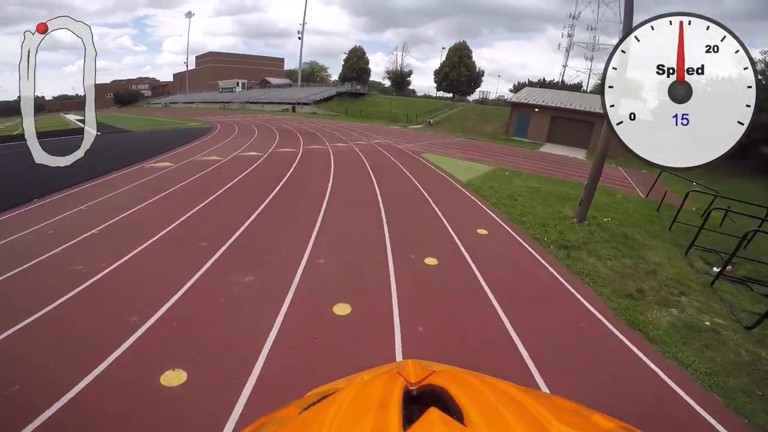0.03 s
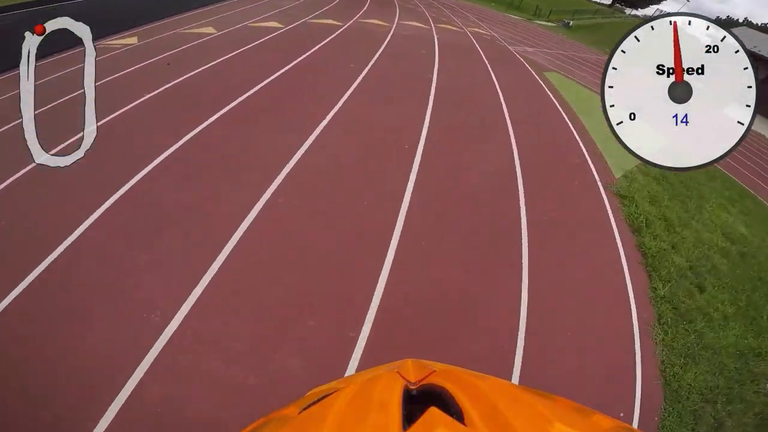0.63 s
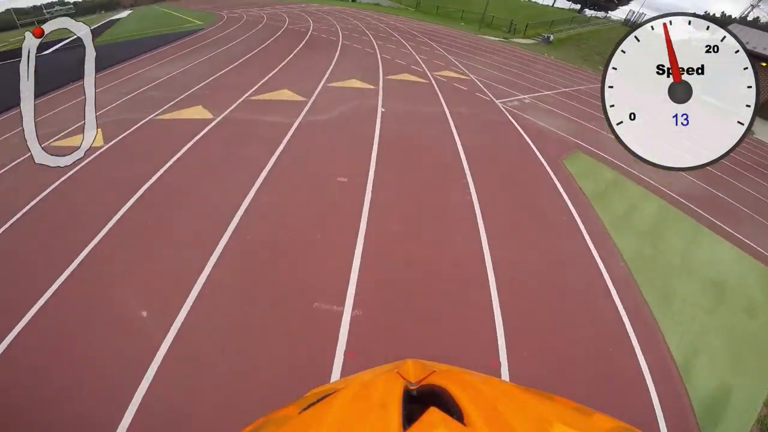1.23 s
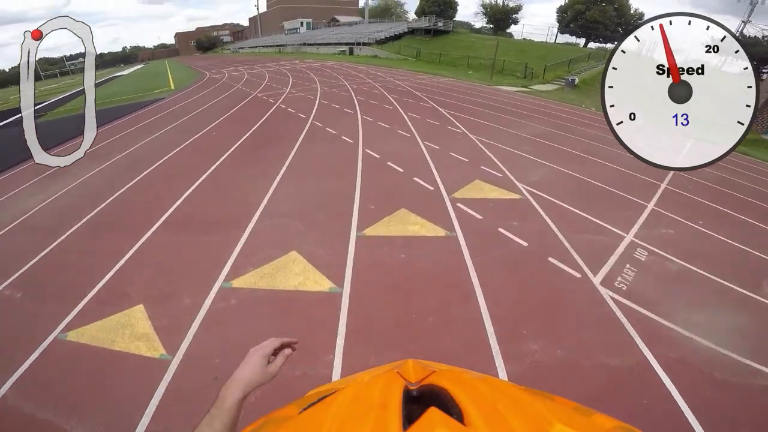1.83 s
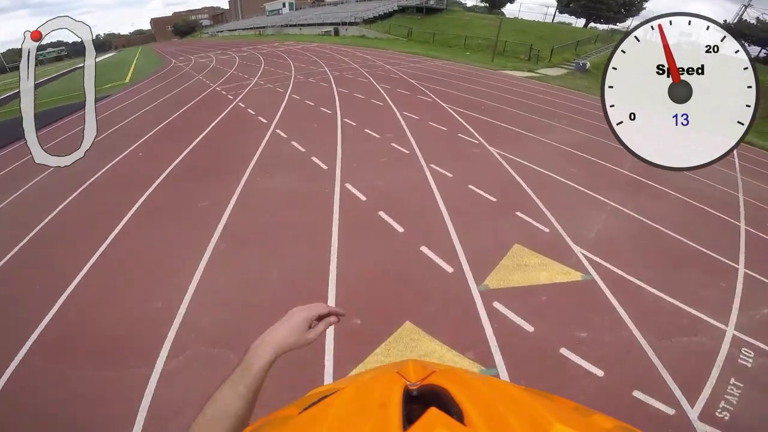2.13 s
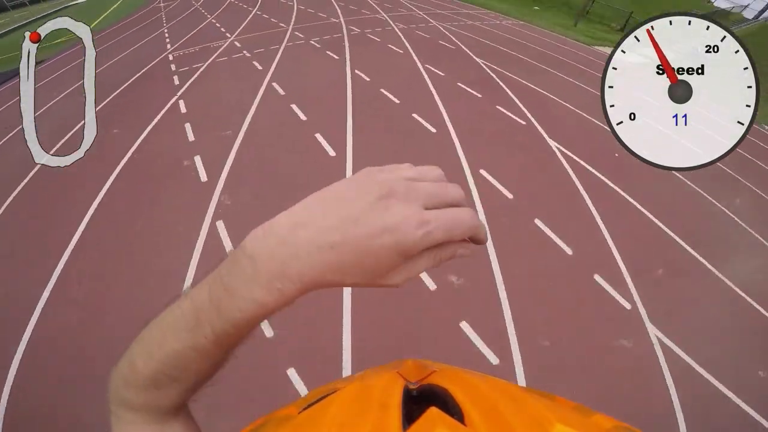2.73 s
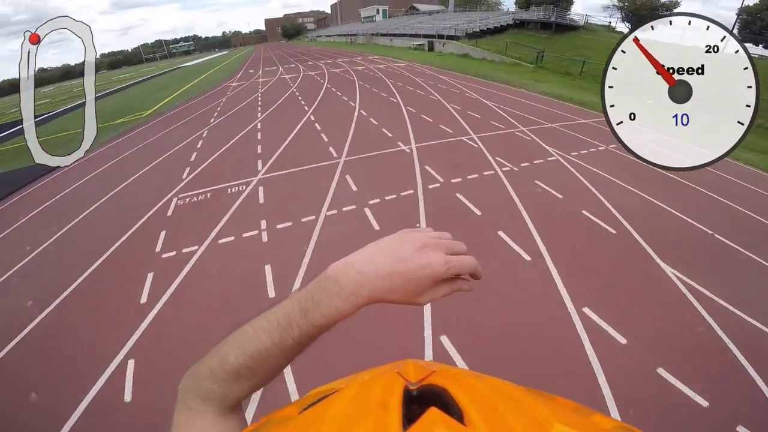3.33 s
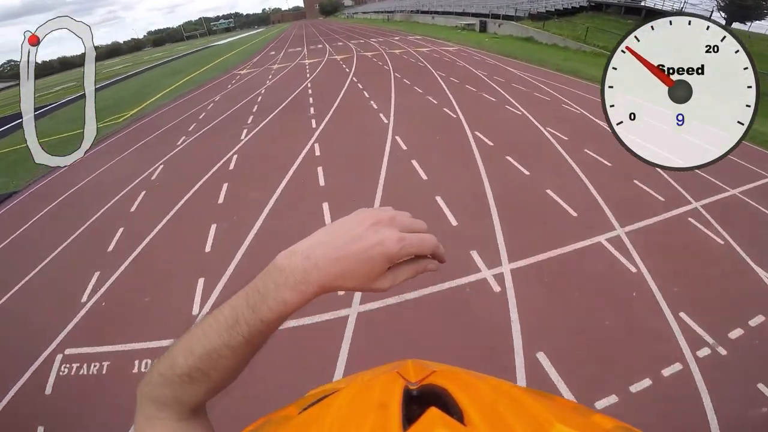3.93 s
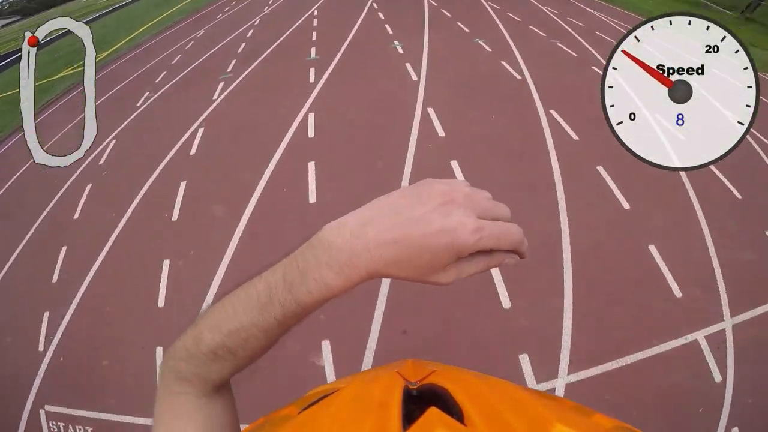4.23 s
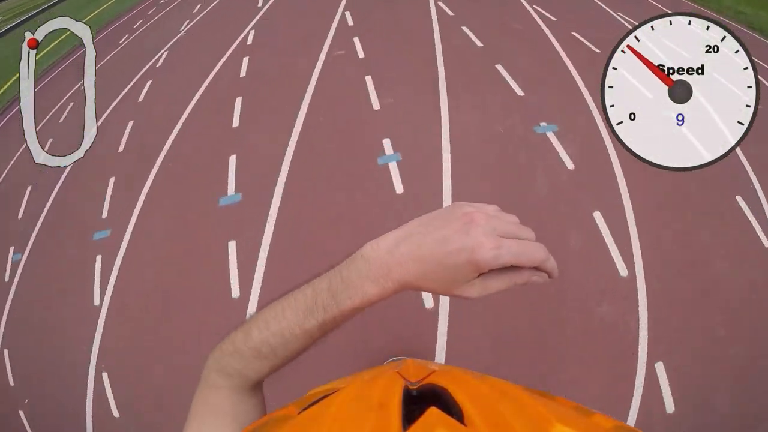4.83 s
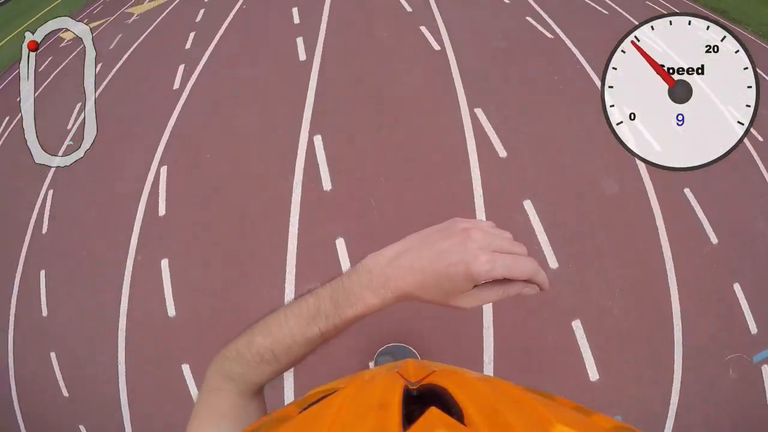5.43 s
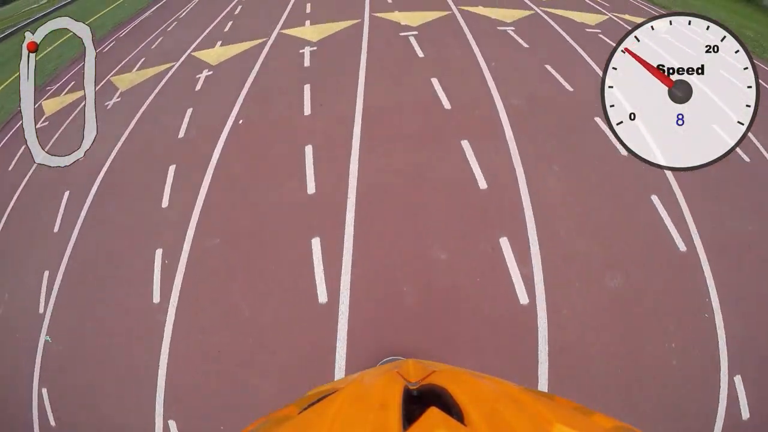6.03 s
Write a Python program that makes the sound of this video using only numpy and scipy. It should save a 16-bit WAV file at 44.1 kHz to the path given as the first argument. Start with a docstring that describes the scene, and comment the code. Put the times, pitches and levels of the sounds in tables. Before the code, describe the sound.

An electric skateboard rolls on a rubber running track, heard from the rider's helmet. From the start, deep wind thumps the microphone over the hollow roar of the wheels, a faint fluttering hiss and a steady low boom. Stronger gusts hit at about 0.6 and 1.2 seconds. A soft, brief scuff comes at around 2.2 seconds, followed by a few small, sharp clicks from 2.4 seconds, the loudest at 2.7. The rolling gradually gets quieter and a little lower as the board slows. The wind swells again between 3 and 4 seconds, then drops away. At about 4.4 seconds the motor gives a short pull, and from 4.8 it holds a faint, fuzzy, slightly raspy whine that rises a little. One more gust thumps near 5.4 seconds, and the rolling and whine continue to the end, just after 6 seconds.

```python
"""An electric skateboard coasts round a rubber running track, heard from a camera on the rider's helmet.
The track's grain shakes wheels and deck into a hollow roar, and rubber peeling off the track hisses.
Wind thumps the microphone and eases as the board slows. A brief scuff and a few sharp clicks come
midway; then the motor pulls again with a faint, fuzzy whine."""
import sys
import numpy as np
from scipy import signal
from scipy.fft import rfft, irfft
from scipy.io import wavfile
from scipy.ndimage import uniform_filter1d, minimum_filter1d

SR = 44100
rng = np.random.default_rng(int(sys.argv[2]) if len(sys.argv) > 2 else 0)


def digitize_waveform(pressure):
    """Quantize a signal to 16-bit integers and store it at the path in sys.argv[1].

    Rows of a 2-D input are taken as channels; values are limited to [-1, 1].
    """
    field = np.atleast_2d(pressure).T
    bounded = np.clip(field, -1, 1)
    quanta = np.round(bounded * 32767).astype(np.int16)
    wavfile.write(sys.argv[1], SR, quanta)


N = 272979
TIME = np.arange(N) / SR
WHINE_START_HZ = 1977


def gain_of(db):
    """Turns decibels into a number to multiply a sound by."""
    return 10 ** (np.asarray(db) / 20)


def evened(x):
    """Scales a signal so that its average power is one."""
    return x / np.sqrt(np.mean(x ** 2) + 1e-20)


def follow(rows, t=TIME):
    """Joins timed rows with straight lines, giving one curve for each column after the time."""
    times, *columns = np.transpose(rows)
    return [np.interp(t, times, column) for column in columns]


def level_at(colour, hz):
    """Looks up the dB at hz in a colour, a table of how strong each frequency is."""
    frequencies, levels_db = np.transpose(colour)
    return np.interp(np.log(hz + 1), np.log(frequencies + 1), levels_db)


def add(mix, start_s, sound):
    """Mixes a sound in at start_s seconds."""
    part = mix[round(start_s * SR):][:len(sound)]
    part += sound[:len(part)]


def noise(colour, size=N):
    """Steady noise with the given colour."""
    gains = gain_of(level_at(colour, np.fft.rfftfreq(size, 1 / SR)))
    return evened(irfft(rfft(rng.standard_normal(size)) * gains, size))


def wander(rate_hz):
    """A smooth random curve that wobbles up to about rate_hz times a second."""
    hz = np.fft.rfftfreq(N, 1 / SR)
    return evened(irfft(rfft(rng.standard_normal(N)) / (1 + (hz / rate_hz) ** 4), N))


def moving_noise(colour_at, size=1024):
    """Noise of even power whose changing colour is colour_at(times, frequencies), in dB."""
    frames = dict(nperseg=size, noverlap=size - size // 4)
    hz, t, spectra = signal.stft(rng.standard_normal(N), SR, **frames)
    gains = gain_of(colour_at(t, hz[:, None]))
    gains = gains / np.linalg.norm(gains, axis=0)
    return evened(signal.istft(spectra * gains, **frames)[1][:N])


def steadied(x, span_s):
    """Takes the slow, random swells out of a noise."""
    return x / np.sqrt(uniform_filter1d(x ** 2, int(span_s * SR)) + 1e-6)


def fuzzy_tone(hz, width_hz):
    """A narrow band of noise around a pitch, which may be steady or moving."""
    phase = 2 * np.pi * np.cumsum(np.full(N, hz)) / SR
    return evened(wander(width_hz / 2) * np.cos(phase) + wander(width_hz / 2) * np.sin(phase))


def swell(middle_s, length_s, t):
    """A bell-shaped rise and fall, one at its top."""
    return np.exp(-(2 * (t - middle_s) / length_s) ** 2)


def chop(t=TIME):
    """How choppy the air is: spells full of small swirls come and go."""
    # Each row: middle in seconds, length in seconds, lift of the small swirls in dB.
    squalls = [(0.19, 1, 5.5), (1.8, 0.54, 3), (3.246, 0.74, 3.5)]
    return sum(lift_db * swell(middle_s, length_s, t) for middle_s, length_s, lift_db in squalls)


def pace(t=TIME, cruise_m_per_s=5):
    """The board slows, then picks up a little: 0 means cruising speed, -1 half of it."""
    # Each row: time in seconds, speed in metres per second.
    speeds = [(0, 7.06), (1.9, 5.94), (3.1, 4.96), (3.7, 4.66), (4.7, 3.41), (6.19, 4.1)]
    return np.log2(follow(speeds, t)[0] / cruise_m_per_s)


def load(rise_s=0.1, release_s=0.12, sag_per_s=0.1):
    """How hard the motor works: each pull builds quickly, sags as the board gains speed, and lets go."""
    # Overlapping pulls add up. Each row: start in seconds, length in seconds, strength from 0 to 1.
    pulls = [(4.42, .17, 0.5), (4.78, 1.6, .75), (4.826, 0.13, 0.3), (5.213, 0.1, 0.3)]
    total = 0
    for start_s, length_s, strength in pulls:
        age = np.maximum(TIME - start_s, 0)
        fall = np.exp(-sag_per_s * age - np.maximum(age - length_s, 0) / release_s)
        total += strength * np.minimum(age / rise_s, 1) * fall
    return total


def whine_pitch(t=TIME, climb_start_s=4.9, climb_hz_per_s=190, top_hz=2080):
    """The motor's pitch in Hz, which climbs steadily and then levels off."""
    return np.minimum(WHINE_START_HZ + climb_hz_per_s * np.maximum(t - climb_start_s, 0), top_hz)


def camera_whistle(level_db=-3):
    """The camera's electronics give off faint, steady, high tones."""
    # Each row: pitch in Hz, relative level in dB.
    tones = [(6293, -78), (6325, -76), (8716, -83), (12618, -73.5)]
    return sum(gain_of(level_db + db) * np.sqrt(2) * np.sin(2 * np.pi * hz * TIME) for hz, db in tones)


def clock_ripple(sound):
    """The camera's sample clock wobbles, which adds faint copies of the sound in the treble."""
    # Each row: wobble rate in Hz, timing swing in dB (0 dB is one sample).
    ripples = [(7812, -17), (11719, -20), (15625, -23)]
    swing = sum(gain_of(db) * np.sin(2 * np.pi * hz * TIME) for hz, db in ripples)
    return swing * np.gradient(sound, axis=1)


def limited(x, ceiling_db=-6, hold_s=0.02):
    """A limiter turns the sound down briefly around the strongest thumps."""
    size = int(hold_s * SR)
    allowed_gain = np.minimum(gain_of(ceiling_db) / (abs(x) + 1e-9), 1)
    return x * uniform_filter1d(minimum_filter1d(allowed_gain, size), size)


def boom(level_db=-28):
    """A deep, steady boom runs under everything and shows when the wind drops."""
    return gain_of(level_db) * steadied(fuzzy_tone(hz=52, width_hz=16), span_s=0.36)


def hums(fade_s=0.14):
    """Low, rough hums well up in the roar, hold and fade out."""
    # Each row: middle in seconds, length in seconds, pitch in Hz, level in dB.
    spells = [(.2, 0.71, 209.8, -30.5), (1.85, 0.51, 358.5, -30), (3.146, .25, 438.5, -32)]
    out = np.zeros(N)
    for middle_s, length_s, hz, level_db in spells:
        fade = np.clip((length_s / 2 - abs(TIME - middle_s)) / fade_s + 0.5, 0, 1)
        out += gain_of(level_db) * fade * fuzzy_tone(hz, width_hz=80)
    return out


def drone(fringe_db=-7):
    """A drone with a wider, fainter fringe comes and goes, pitched above the roar."""
    # Each row: time in seconds, pitch in Hz, level in dB.
    course = [(0, 591.5, -39), (1.0, 640, -36), (1.9, 669, -46.5), (2.6, 698, -41), (3.4, 691.4, -50),
              (4.4, 665.3, -41), (5.35, 637.8, -36.5), (5.8, 553.4, -36.5), (6.19, 471, -40)]
    hz, level_db = follow(course)
    core = fuzzy_tone(hz, width_hz=144)
    return gain_of(level_db) * (core + gain_of(fringe_db) * fuzzy_tone(hz, width_hz=300))


def scuffs():
    """Brief rubs that swell and fade."""
    # Each row: middle in seconds, length in seconds, level in dB.
    rubs = [(0.505, .05, -45), (2.15, 0.12, -47.5), (2.341, 0.05, -38)]
    # Each row: frequency in Hz, relative level in dB.
    rub_colour = [(400, -5), (1000, 11), (2000, -2), (3500, -6), (5600, -4.5), (7000, -22), (15000, -30)]
    out = np.zeros(N)
    for middle_s, length_s, level_db in rubs:
        size = int(length_s * SR)
        arch = np.sin(np.linspace(0, np.pi, size))
        add(out, middle_s - length_s / 2, gain_of(level_db) * noise(rub_colour, size) * arch)
    return out


def clicks(rebound_s=0.00191, rebound_db=-5, snap_fade_s=0.0066):
    """Each small, hard click rings briefly with a bright snap, and bounces once."""
    # Each row: start in seconds, level in dB, relative level of the snap in dB.
    hits = [(0.321, -35.5, 5), (2.3858, -27, -4), (2.3982, -21, -3.5), (2.4540, -20, -11),
            (2.667, -27, -21), (2.678, -10, -30)]
    # Each row: pitch in Hz, relative level in dB, seconds to fade by 60 dB.
    ring_tones = [(828, 4.5, 0.024), (1275, 3.5, 0.041), (1750, 2, 0.017), (2327, 3, 0.022),
                  (2970, -6.5, 0.011), (4200, -15, 0.0075), (5600, -11, 0.0074)]
    # Each row: frequency in Hz, relative level in dB.
    snap_colour = [(500, -12), (2000, 8), (4500, 7), (7000, 0), (9000, -4), (15000, -16)]
    out, t = np.zeros(N), np.arange(2048) / SR
    ring = sum((-1) ** k * gain_of(db - 60 * t / fade_s) * np.sin(2 * np.pi * hz * t)
               for k, (hz, db, fade_s) in enumerate(ring_tones))
    ring /= abs(ring).max()
    for start_s, level_db, snap_db in hits:
        for delay_s, loss_db in [(0, 0), (rebound_s, rebound_db)]:
            snap = noise(snap_colour, len(t)) * gain_of(snap_db - 60 * t / snap_fade_s) / 2
            add(out, start_s + delay_s, gain_of(level_db + loss_db) * (ring + snap))
    return out


def wind(level_db=0.53, usual_db=-20, buffet_db=0.96, gust_s=0.042, deep_hz=30, small_above_hz=60):
    """Swirls of air thump the microphone: deep ones in gusts, smaller, higher ones in choppy air."""
    # Each row: time in seconds, strength of the airflow in dB.
    airflow = [(0, -19.5), (1.0, -21), (1.6, -17), (2.65, -19.5), (2.83, -24.5), (3.1, -16), (4.05, -19),
               (4.3, -26.5), (6.19, -29.5)]
    # Each row: middle of a gust in seconds, lift in dB.
    gusts = [(.03, -1.5), (.58, 6.5), (1.24, 4.5), (2.16, 0), (2.28, 1), (3.22, 1.5), (3.51, 3), (4.55, 4),
             (4.95, 4), (5.39, 10.5), (5.91, 3.5)]
    # Each row: frequency in Hz, relative level in dB.
    wind_colour = [(8, -22.5), (18, -3.5), (28, 4.5), (40, -1), (52, 2.5), (75, -5.5), (110, -9.5),
                   (160, -13.5), (220, -20.5), (320, -25), (600, -45.5), (1200, -63), (4000, -102)]

    def gust_db(t):
        return sum(lift_db * swell(middle_s, gust_s, t) for middle_s, lift_db in gusts)

    def colour_at(t, hz):
        excess_db = follow(airflow, t)[0] - usual_db
        small_swirls_db = -1.5 + 0.36 * excess_db + chop(t) - gust_db(t)
        upper_range = np.clip(np.log2((hz + 1) / small_above_hz), 0, 1)
        deep_swirls_db = excess_db / (1 + (hz / deep_hz) ** 4)
        return level_at(wind_colour, hz) + small_swirls_db * upper_range + deep_swirls_db
    swirls = steadied(moving_noise(colour_at, size=4096), span_s=0.0703)
    strength_db = follow(airflow)[0] + gust_db(TIME) + buffet_db * wander(rate_hz=13)
    return gain_of(level_db + strength_db) * swirls


def motor(level_db=-51, rasp_db=4, shimmer_db=-26, pulsing_db=2, throb_hz=5.5, settled_s=4.8):
    """The motor pulls with a fuzzy, pulsing whine, a lower tone, a rasp and a throbbing high shimmer."""
    # Each row: frequency in Hz, relative level in dB.
    rasp_colour = [(300, -24), (700, 4.5), (950, 8), (1400, -3.5), (2600, -4.5), (3400, -33), (4500, -7.5),
                   (5100, -27), (6300, -12.5), (7200, -26), (15000, -43)]
    hz = whine_pitch()
    whine = gain_of(pulsing_db * wander(rate_hz=9.9)) * fuzzy_tone(hz, width_hz=186)
    # The tone about an octave down fades once the board is under way.
    lower_db = -1 - 11 * np.clip(TIME - settled_s, 0, 1)
    lower = gain_of(lower_db) * fuzzy_tone(hz * 0.495, width_hz=86.4)
    throb = 1 + 0.5 * np.sin(2 * np.pi * throb_hz * TIME + wander(rate_hz=2))
    shimmer = gain_of(shimmer_db) * throb * fuzzy_tone(hz=9950, width_hz=500)
    rasp = gain_of(rasp_db) * noise(rasp_colour)
    return gain_of(level_db) * load() * (whine + lower + shimmer + rasp)


def hiss(level_db=-50.5, flutter_db=0.72, patchy_db=2, peak_db=2, treble_hz=5400):
    """Rubber peels off the track with a fluttering hiss, louder with speed and as the motor pulls."""
    # Each row: frequency in Hz, relative level in dB.
    hiss_colour = [(400, -14), (950, 4.5), (1180, 5.5), (1400, -1), (1800, 3.5), (2300, 1.5), (3000, 0.5),
                   (3700, -0.5), (4600, -1), (5500, -6), (6400, -12.5), (7000, -19), (10000, -20),
                   (15500, -55)]
    # Each row: time in seconds, centre of a broad peak in Hz, lift of the treble in dB.
    drift = [(0, 2300, 1), (1.2, 2210, 1.5), (1.9, 2080, -2), (2.6, 2500, 3), (3.3, 3200, -4.5),
             (4.4, 2620, 3.5), (4.9, 2600, -0.5), (5.5, 2650, 3), (6.19, 2620, -4)]

    def colour_at(t, hz):
        def hump(centre_hz, octaves):
            return np.exp(-(np.log2((hz + 1) / centre_hz) / octaves) ** 2)
        peak_hz, treble_db = follow(drift, t)
        lift_db = treble_db * hump(treble_hz, octaves=0.59) + peak_db * hump(peak_hz, octaves=0.32)
        # Random patches, smoothed over frequency and then over time.
        patches = uniform_filter1d(rng.standard_normal(lift_db.shape), size=5, axis=0)
        patches = uniform_filter1d(patches, size=60, axis=1)
        return level_at(hiss_colour, hz) + lift_db + patchy_db * evened(patches)
    peeling = moving_noise(colour_at)
    return peeling * gain_of(level_db + 2 * pace() + load() + flutter_db * wander(rate_hz=24))


def wheels(roar_db=-30, body_db=-39.5, bumps_db=1.23):
    """The track's grain shakes wheels and deck into a hollow roar over a deep body."""
    # Each row of both tables: frequency in Hz, relative level in dB.
    roar_colour = [(60, -38), (170, -9), (215, -9.5), (270, -14.5), (350, -2), (420, 2.5), (500, -1),
                   (600, -10.5), (720, -15.5), (820, -24), (1100, -31), (1400, -48.5), (2500, -68.5)]
    body_colour = [(60, -31), (160, -14.5), (215, -3.5), (290, 0.5), (350, -3), (500, -23), (1000, -55)]

    # The roar grows quieter and lower as the board slows, and rises as the motor pulls.
    def colour_at(t, hz):
        pitch_ratio = 2 ** (0.16 * pace(t)) * (whine_pitch(t) / WHINE_START_HZ) ** 2.34
        return level_at(roar_colour, hz / pitch_ratio)
    rolling = steadied(moving_noise(colour_at, size=2048), span_s=0.14)
    roar = gain_of(roar_db + 9 * pace() + 2.5 * load()) * rolling
    # The body comes forward in slow coasting and in choppy air.
    body = gain_of(body_db - 6 * pace() + 1.64 * chop() - 2 * load()) * noise(body_colour)
    return (roar + body) * gain_of(bumps_db * wander(rate_hz=18))


def scene():
    """Wind, board and small handling sounds meet at one microphone."""
    return (wind() + boom() + hums() + wheels() + drone() + hiss() + motor() + clicks() + scuffs())[None]


def record(dry):
    """The camera adds its ripple and whistle, holds down loud thumps and cuts the highest treble."""
    picked_up = dry + clock_ripple(dry) + camera_whistle()
    treble_cut = signal.firwin(511, cutoff=15750, window=("kaiser", 9), fs=SR)
    return signal.oaconvolve(limited(picked_up), treble_cut[None], "same")


dry = scene()
out = record(dry)
digitize_waveform(out)
```